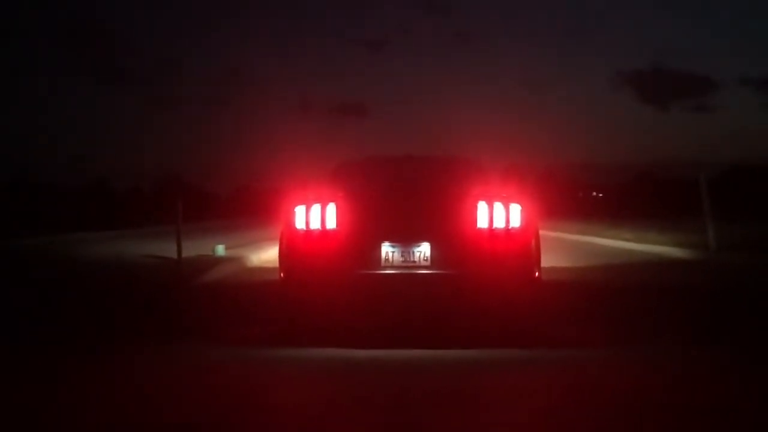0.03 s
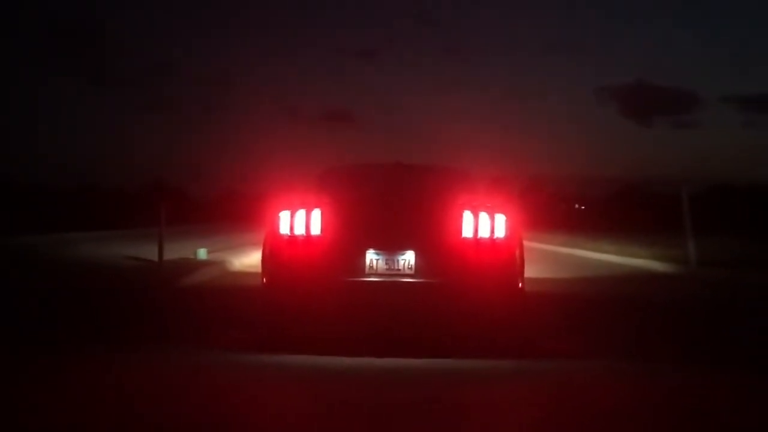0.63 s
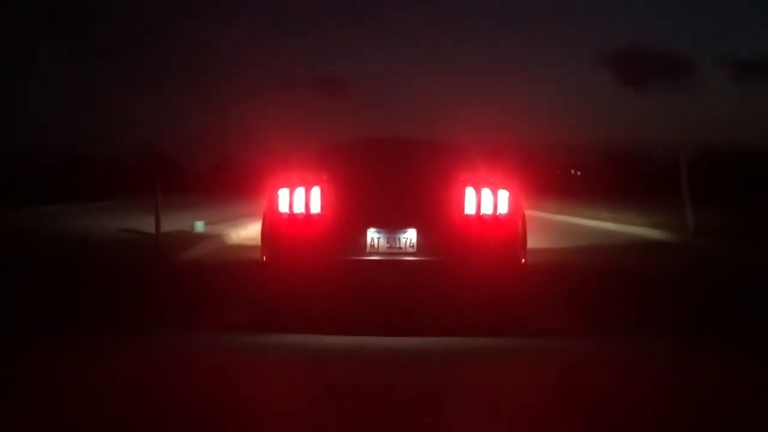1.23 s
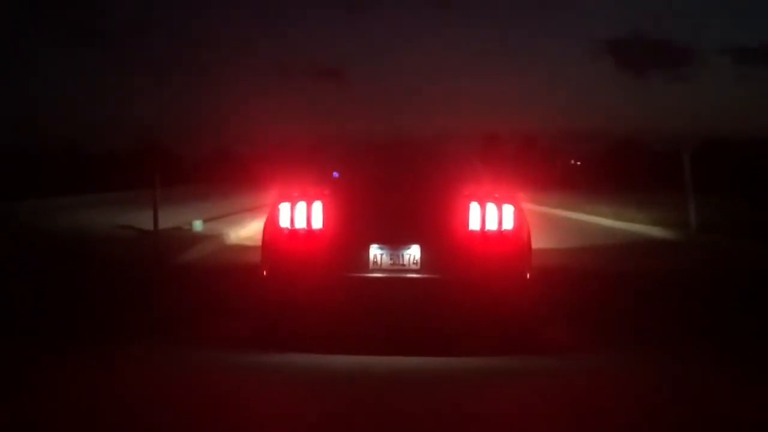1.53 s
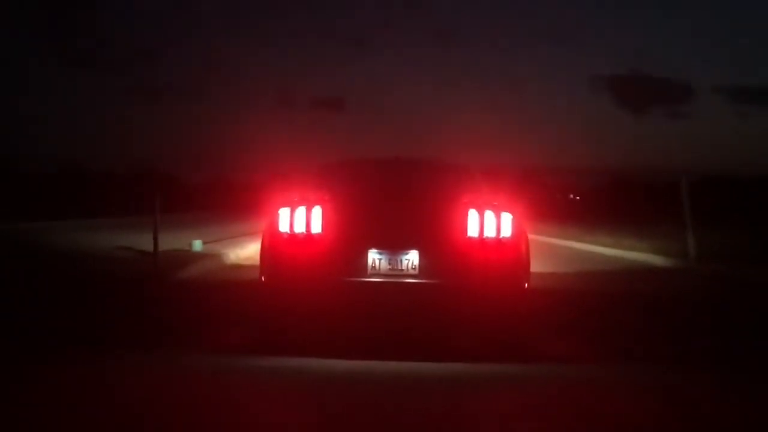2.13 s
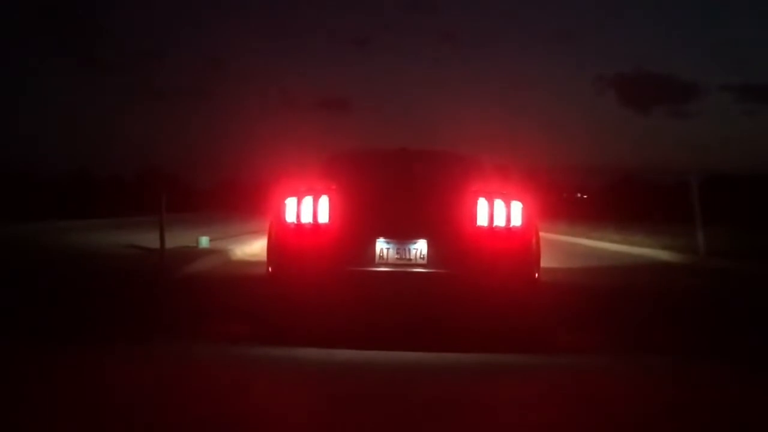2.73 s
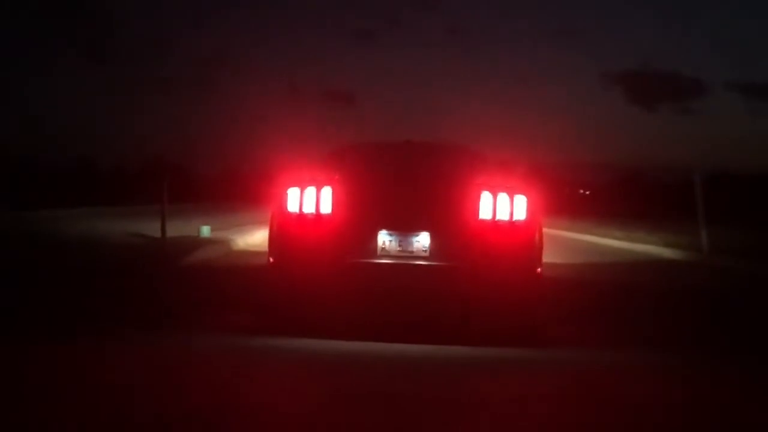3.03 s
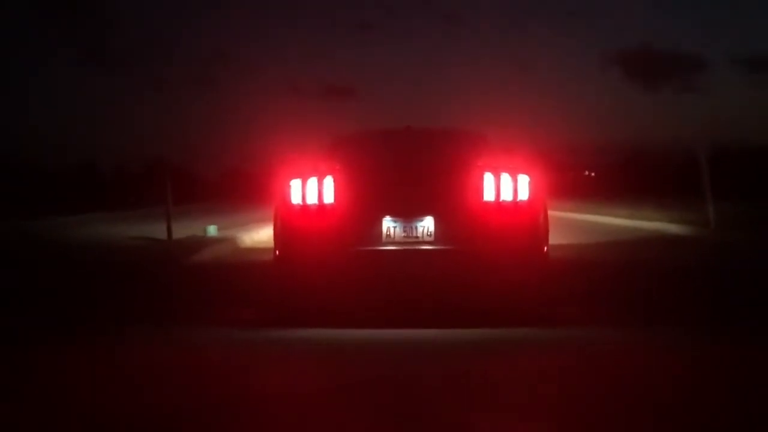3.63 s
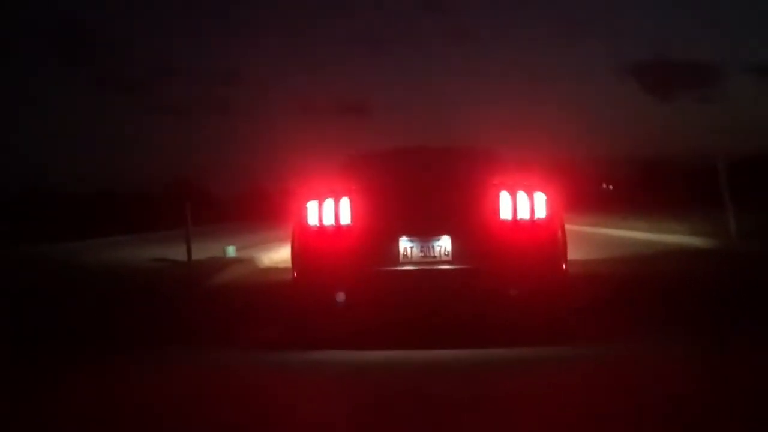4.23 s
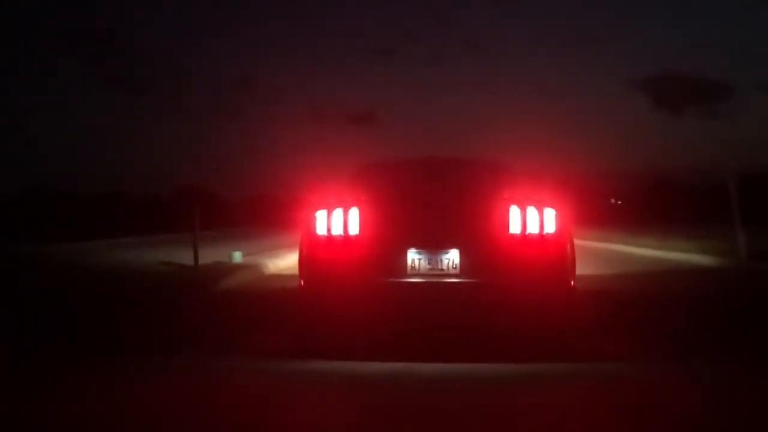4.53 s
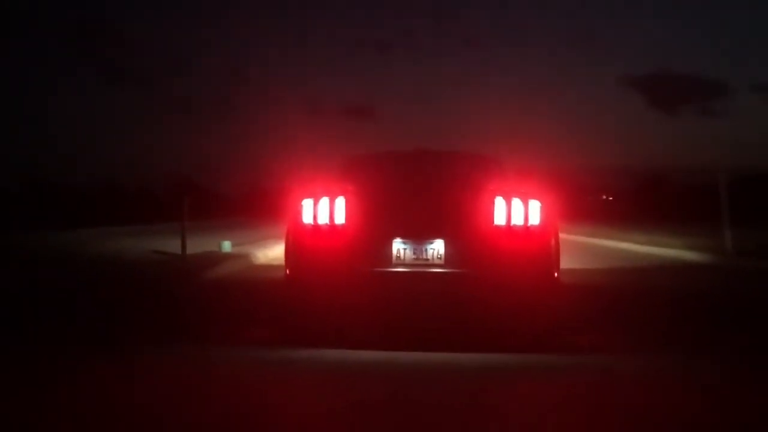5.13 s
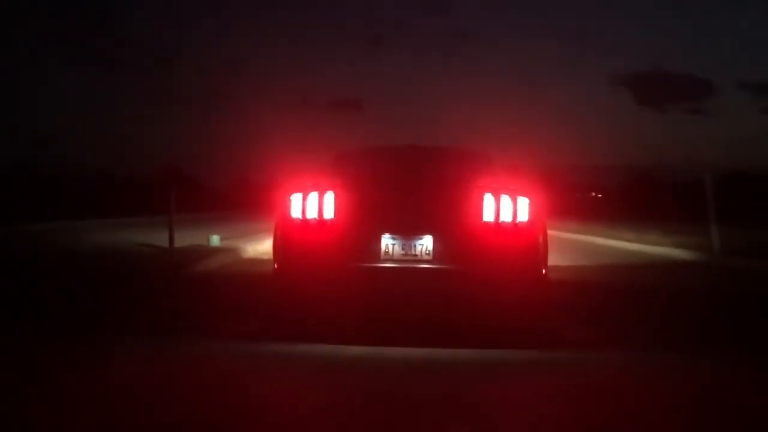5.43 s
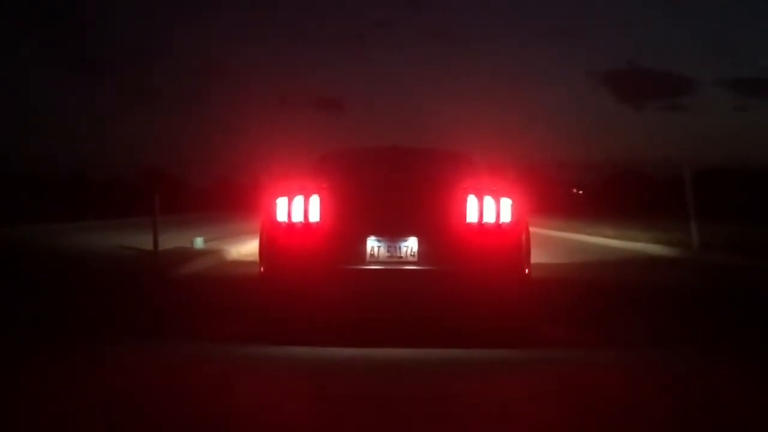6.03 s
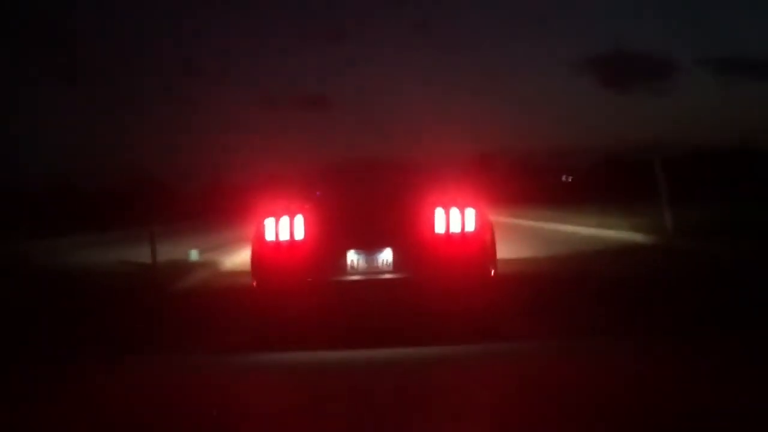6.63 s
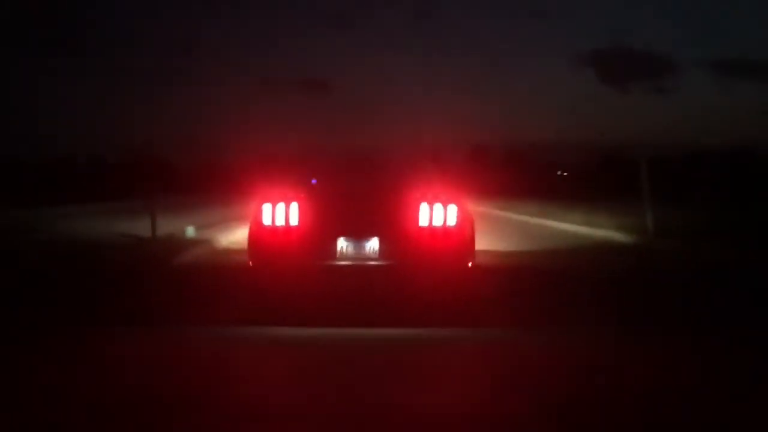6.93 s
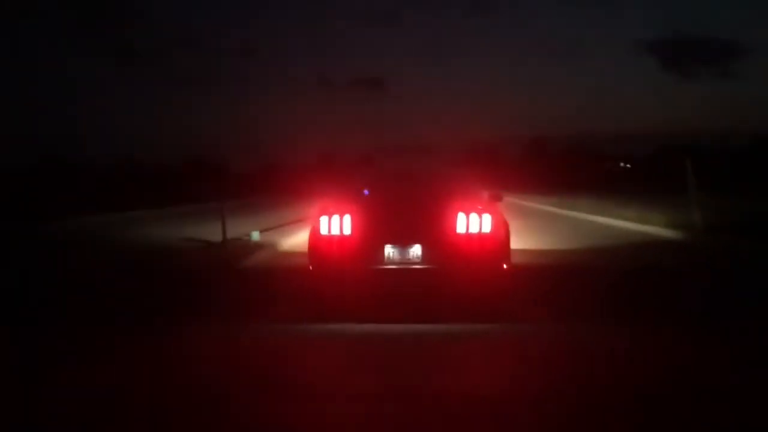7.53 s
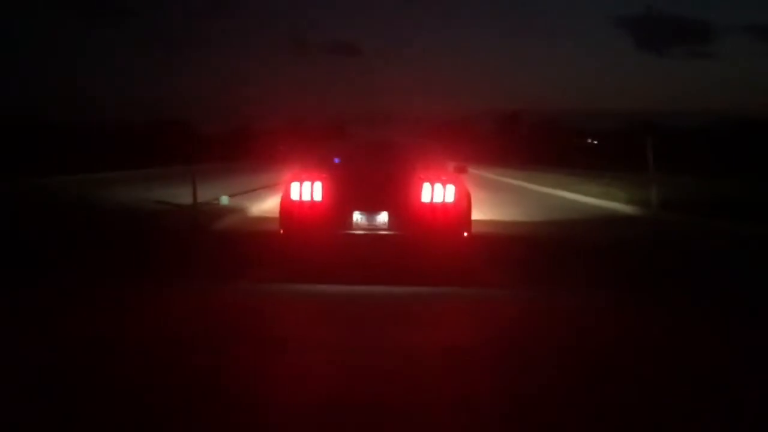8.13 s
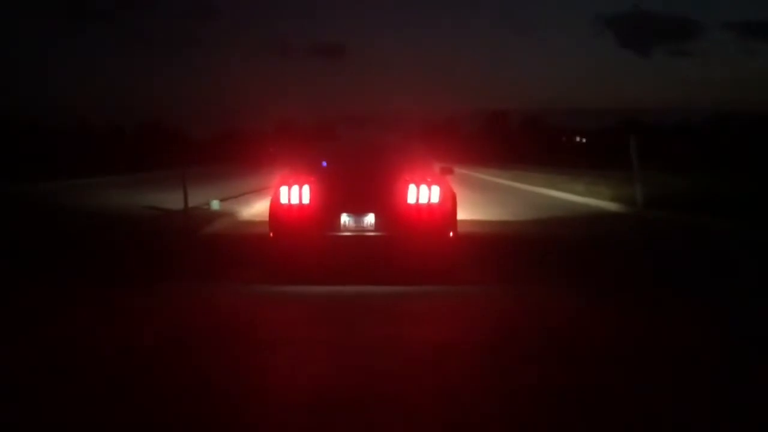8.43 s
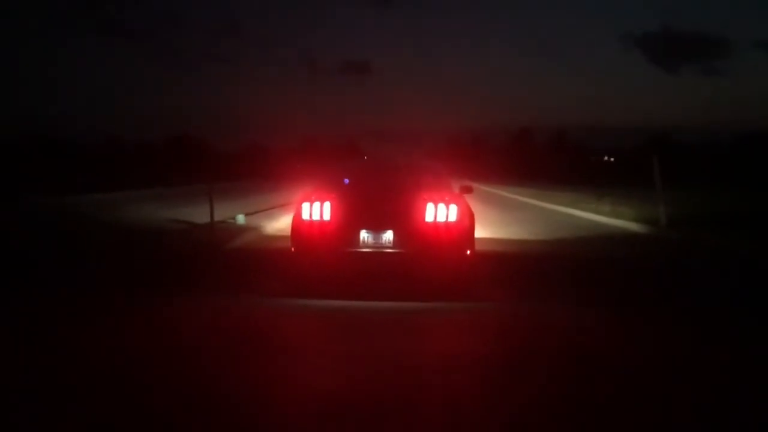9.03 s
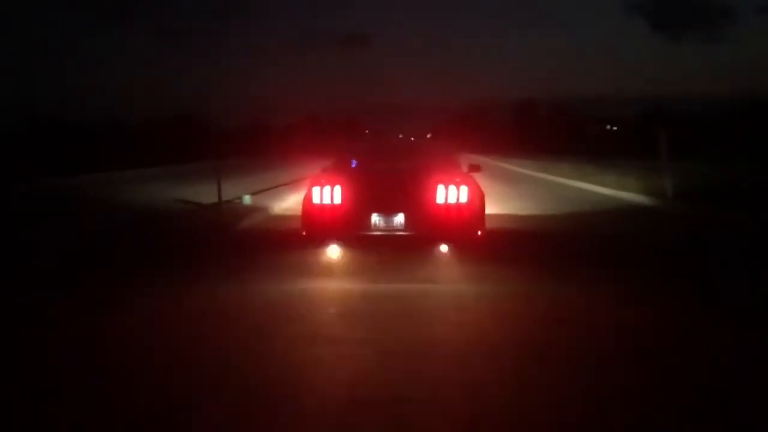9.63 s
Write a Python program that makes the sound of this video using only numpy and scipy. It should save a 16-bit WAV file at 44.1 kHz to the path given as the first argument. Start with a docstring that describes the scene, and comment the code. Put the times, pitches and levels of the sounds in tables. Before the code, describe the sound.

A tuned V8 car is heard from just behind on an open road, starting with a lumpy burble that sinks in pitch. At about 1.1 seconds it revs in a raspy roar, with a pop at 1.4. Shorter blips follow at 2, 2.5 and 3 seconds, then a quick crackle of pops at 3.5. Higher revs around 3.8 to 4.4 seconds bring a cluster of loud backfire bangs. Paired blips with more bangs come at about 5.1 to 5.6, 6.5 to 6.9 and 7.7 to 8.2 seconds. Between them the engine winds down, burbling, hissing and ticking, with scattered pops, including ones near 6, 8.4 and 9 seconds. A last rev at 9.5 seconds ends with a bang at 9.7. The loudest blasts slightly overload the microphone and leave a faint, dull echo.

```python
"""Tuned V8 with backfires

A V8 is blipped again and again on an open road at night, heard from just behind. On the throttle its
exhaust pulses excite the pipe resonances into a roar, and their turbulence rasps; off it the engine
lopes down, hissing and ticking. Unburnt fuel goes off as pops and bangs that overload the microphone."""
import sys
import numpy as np
from scipy import signal
from scipy.io import wavfile
from scipy.ndimage import uniform_filter1d

SR = 44100
rng = np.random.default_rng(int(sys.argv[2]) if len(sys.argv) > 2 else 0)


def unload_wav(signal):
    """Save mono or channel-first audio to the path in sys.argv[1] as 16-bit WAV at rate SR, clipped to [-1, 1]."""
    wavfile.write(
        sys.argv[1],
        SR,
        np.round(np.clip(np.atleast_2d(signal).T, -1, 1) * 32767).astype(np.int16),
    )


N = 432180
TIME = np.arange(N) / SR

# Engine speeds count four-stroke cycles a second; levels are relative within each layer.
# throttle blips: (start [s], length [s], roar rise [s], rasp rise [s], release [s],
# speed once open [Hz], speed at lift-off [Hz], roar [dB], rasp [dB], rumble [dB])
BLIPS = [ (1.098, 0.038, 0.016, 0.013, .015, 15.2, 15, -14.5, -42, -48),
         (1.16, 0.52, .17, .205, 0.14, 18, 19.3, -12.5, -22, -28.5),
         (2.062, 0.32, .1, .12, 0.048, 21.2, 23.6, -12.5, -21, -27),
         (2.486, .11, 0.14, 0.049, .045, 23.1, 27.3, -11, -29.5, -22.5),
         (3.035, 0.29, 0.093, 0.095, 0.065, 23.8, 25.6, -13, -19, -30),
         (3.837, 0.22, 0.088, .072, .025, 23.6, 29.8, -11.5, -19, -24.5),
         (4.183, .125, .06, .005, .018, 33, 35.5, -13, -16, -21),
         (5.103, 0.12, 0.077, .044, 0.032, 28.2, 31.3, -10.5, -18.5, -22.5),
         (5.376, .253, 0.05, 0.0073, 0.088, 30.8, 38, -13, -17, -21),
         (6.467, .13, 0.065, .052, 0.04, 28.5, 30.4, -11, -19, -32),
         (6.694, .145, .06, 0.0053, .03, 30.3, 35.8, -14.5, -17.5, -25),
         (7.719, .142, 0.052, .038, 0.039, 25.9, 30.8, -10.5, -19.5, -39),
         (7.984, 0.21, 0.053, .01, 0.036, 32.6, 39, -11.5, -20, -24.5),
         (9.472, 0.21, 0.077, .095, .028, 24.4, 31.5, -11, -17, -21)]
# spells with the throttle shut: (start [s], end [s], first speed [Hz], last speed [Hz], first burble [dB],
# last burble [dB], first hiss [dB], last hiss [dB], silencer drone [factor], lope [dB])
COASTS = [ (-.05, 1.155, 26.2, 13.9, -22, -17, -39.5, -32, 5.5, 22.5),
          (1.659, 2.056, 18.4, 16.8, -20.5, -23.5, -51, -40.5, 1.4, 4),
          (2.6, 3.042, 21.2, 20, -21, -21, -46, -44, 0.6, -2),
          (3.457, 3.836, 23.4, 20.2, -35, -21, -49.5, -37, 3.5, 9),
          (4.345, 5.097, 35.6, 25.45, -26, -20.5, -22, -34.5, 2.6, 1.5),
          (5.62, 6.468, 37.1, 25.35, -20.5, -22.5, -24, -32, 2, 1.5),
          (6.9, 7.715, 34.7, 23.9, -21, -23.5, -25, -41, 2.7, 7),
          (8.23, 9.47, 38.8, 23, -23, -21, -22.5, -40.5, 3.5, 6)]
# cylinders in firing order: (strength [dB], lateness [firing gaps]) on the throttle, then both coasting
CYLINDERS = [(-1.5, 0.016, -1, .13), (-5, 0.079, -1, 0.066), (-0.5, 0.01, -8.5, .19), (3.5, 0.09, -7, -.5),
             (-4.5, 0.1, -3, -.17), (-6.5, 0.0047, -7.5, -.03), (-3.5, 0.023, -7.5, .1),
             (2, 0.0086, -5, .26)]
# standing waves of the hot exhaust: (frequency [Hz], width [Hz], gain [dB])
HOT_MODES = [(241, 42, 8.5), (314, 56, 5.5), (530, 83, 2.5), (756, 23, 3.5), (799, 29, -20.5)]
# spectral envelopes of turbulent rasp, flame blasts and sharp ticks: (frequency [Hz], gain [dB])
RASP_SPECTRUM = [(100, -14), (400, 11.5), (900, 5.5), (1600, -3), (2300, 0.5), (3500, -3), (4800, -6),
                 (6200, -5), (7400, -9.5), (8700, -11.5)]
BLAST_SPECTRUM = [(25, -15.5), (80, -12), (160, -2), (250, 2), (450, 2), (750, -3), (1200, -17),
                  (2000, -17.5), (5000, -57.5)]
TICK_SPECTRUM = [(300, -6), (1200, -9.5), (2500, 6), (4000, 5), (6200, 4.5), (7500, -1.5), (8700, -6)]


def amp(db):
    """Amplitude ratio of a level in decibels."""
    return 10 ** (np.asarray(db) / 20)


def ramp(start, length):
    """Linear rise from 0 to 1 over length seconds."""
    return np.clip((TIME - start) / max(length, 1e-3), 0, 1)


def add(mix, start, sound):
    """Superposition: a sound joins the mix at start seconds."""
    part = mix[round(start * SR):][:len(sound)]
    part += sound[:len(part)]


def steadied(x, span):
    """Normalisation: the running rms over span seconds is held at 1."""
    size = max(int(span * SR), 8)
    power = uniform_filter1d(uniform_filter1d(x * x, size), size)
    return x / np.sqrt(abs(power) + 1e-14)


def dying(x, decay):
    """Exponential decay: each click gains a tail with a time constant of decay seconds."""
    return signal.lfilter([1], [1, -np.exp(-1 / (decay * SR))], x)


def softened(x, force, edge_hz):
    """Low-pass blend: a weak jet of gas (force near 0) has rounder pulses and less treble."""
    force = np.clip(force, 0, 1)
    rounded = signal.sosfiltfilt(signal.butter(3, edge_hz, fs=SR, output="sos"), x)
    return force * x + (1 - force) * rounded


def piped(x, spectrum, modes=()):
    """Pipe resonance: a minimum-phase filter of unit energy imposes an envelope and standing waves."""
    # tailpipe resonances and notches: (frequency [Hz], width [Hz], gain [dB])
    tailpipe_modes = [(411.6, 12.2, -25.5), (1060.6, 21, 9), (1197, 8.5, -28.5), (1384, 132, 5.5),
                      (1520, 39, -9), (1873, 56, -6), (2090, 230, 2.5), (2437, 53, -17), (2534, 160, 3),
                      (4940, 320, -6)]
    hz = np.fft.rfftfreq(8192, 1 / SR)
    knot_hz, knot_db = np.transpose(spectrum)
    db = np.interp(np.log(hz + 1), np.log(knot_hz), knot_db)
    for centre, width, gain_db in [*tailpipe_modes, *modes]:
        db += gain_db / (1 + (2 * (hz - centre) / width) ** 2)
    log_gain = np.log(amp(np.r_[db, db[-2:0:-1]]))
    response = np.exp(np.conj(signal.hilbert(log_gain)))
    ring = np.fft.ifft(response).real[:len(hz)]
    return signal.oaconvolve(x, ring / np.linalg.norm(ring))[:len(x)]


def speed():
    """Cycle rate in Hz: it glides exponentially, up on each blip and down when coasting."""
    marks = []
    for start, length, rise, _, release, low, high, *_ in BLIPS:
        marks += [(start + rise, low), (start + length - release, high)]
    for start, end, first, last, *_ in COASTS:
        marks += [(start, first), (end, last)]
    times, hz = np.transpose(sorted(marks))
    return np.exp(np.interp(TIME, times, np.log(hz)))


def firings(strength_db, lateness):
    """Phase is the integral of speed: it sets the time, strength and cylinder of each exhaust stroke."""
    count = len(CYLINDERS)
    strokes = np.cumsum(speed()) * count / SR
    number = np.arange(int(strokes[-1]) - 1)
    cylinder = number % count
    return np.interp(number + lateness[cylinder], strokes, TIME), strength_db[cylinder], cylinder


def pulses(times, db, scatter_db, jitter):
    """Impulse train: one click a stroke, scattered in strength and by jitter seconds in time."""
    size, slip = rng.standard_normal((4096, 2))[:len(times)].T
    at = np.clip(np.round((times + jitter * slip) * SR).astype(int), 0, N - 1)
    return np.bincount(at, amp(db + scatter_db * np.clip(size, -2, 2)), N)


def throttle(opening, closing):
    """Gate: 1 during each blip, falling to 0 once the throttle has snapped shut."""
    gates = (ramp(start, opening) - ramp(start + length, closing) for start, length, *_ in BLIPS)
    return np.clip(sum(gates), 0, 1)


def coast_levels():
    """Envelopes of burble, hiss and rumble in dB: they drift through each spell, and flares shift them."""
    # fuel flaring in the pipes: (middle [s], half length [s], rumble [dB], change of hiss [dB])
    flares = [(1.31, 0.061, -18, 9.5), (1.413, 0.032, -11.5, -11), (1.66, 0.055, -33, 1.5),
              (2.255, 0.033, -17, -1), (3.169, 0.035, -17.5, 3), (3.502, 0.043, -38, 16.5),
              (4.39, 0.039, -23.5, -4.5), (4.566, 0.029, -23.5, 3), (5.752, 0.077, -24.5, 7),
              (5.957, 0.075, -29, 3.5), (6.83, .035, -19.5, 8), (7.083, 0.064, -50, 3),
              (7.819, 0.019, -20, 6), (8.38, 0.062, -29, 4)]
    build_s, hiss_fade_s, burble_fade_s = 0.059, 0.087, 0.15
    burble, hiss, low = (np.full(N, db) for db in (-29.0, -46.5, -47.0))  # while the spark is cut
    for start, end, _, _, burble_from, burble_to, hiss_from, hiss_to, _, _ in COASTS:
        along, built = ramp(start, end - start), ramp(start - build_s, build_s)
        burble_gate = built - ramp(end, burble_fade_s)
        hiss_gate = built - ramp(end - hiss_fade_s, hiss_fade_s)
        burble += burble_gate * (burble_from + (burble_to - burble_from) * along - burble)
        hiss += hiss_gate * (hiss_from + (hiss_to - hiss_from) * along - hiss)
    for middle, half, rumble_db, change_db in flares:
        away = ((TIME - middle) / half) ** 2
        low = np.maximum(low, rumble_db - 9.5 * away)
        hiss += change_db / (1 + away ** 2)
    return burble, hiss, low


def blip_levels():
    """Envelopes of roar, rasp and rumble in dB: each blip leaves the coasting levels and returns."""
    rasp_lag_s = 0.013  # the rasp outlasts the roar
    roar, rasp, low = coast_levels()
    for start, length, roar_rise, rasp_rise, release, _, _, roar_db, rasp_db, rumble_db in BLIPS:
        lift_off = start + length - release
        held = (1 - ramp(lift_off, release)) * ramp(start, roar_rise) ** 0.63  # comes early
        bite = (1 - ramp(lift_off + rasp_lag_s, release)) * ramp(start, rasp_rise) ** 2  # comes late
        roar += held * (roar_db - roar)
        rasp += bite * (rasp_db - rasp)
        low += bite * np.maximum(rumble_db - low, 0)
    return roar, rasp, low


def roadside(x, t60, delay):
    """Scattering: the verges return thin, dull echoes that die away exponentially."""
    t = np.arange(SR // 2) / SR
    taps = rng.standard_normal(len(t)) * (rng.random(len(t)) < 2000 / SR)
    taps *= (t > delay) * amp(-60 * t / t60)
    dull = signal.lfilter(*signal.butter(1, 2500, fs=SR), x)
    return signal.oaconvolve(dull, taps / np.linalg.norm(taps))[:N]


def rumble(level_db):
    """Combustion noise: fuel burning in the pipes flutters at low frequencies."""
    # spectral envelope of the flame: (frequency [Hz], gain [dB])
    flame_spectrum = [(15, -19), (35, -20), (60, -1), (90, -12.5), (140, -5), (300, -34), (1000, -78.5)]
    return amp(level_db) * steadied(piped(rng.standard_normal(N), flame_spectrum), span=0.031)


def drone_and_lope():
    """Speed-dependent gains: the silencers drone as speed sinks; near one speed a cylinder thumps."""
    drone_hz, lope_hz, lope_width_hz = 17.9, 27.3, 2.4
    hz, spells = speed(), np.array(COASTS)
    spell = np.maximum(np.searchsorted(spells[:, 0], TIME) - 1, 0)
    drone, lope_db = spells[spell, -2:].T
    nearness = np.exp(-((hz - lope_hz) / lope_width_hz) ** 2)
    return drone * (drone_hz / hz) ** 2, lope_db * nearness - 2


def ticking_hiss(times, strength_db, hiss_db):
    """Flow noise and wave steepening: the gas hisses in puffs, and some pulses sharpen into ticks."""
    # spectral envelope of the gas flow: (frequency [Hz], gain [dB])
    hiss_spectrum = [(200, 0), (700, 7), (1300, -6), (1800, -5.5), (2700, 0), (3400, 3), (4400, 0),
                     (5500, -11), (6500, -7), (7600, -9.5), (8700, -16.5)]
    shocks = pulses(times, strength_db, scatter_db=5.5, jitter=0.0001)
    puffs = (dying(shocks, decay=0.0021) + 0.62) * rng.standard_normal(N)
    hiss = steadied(piped(puffs, hiss_spectrum), span=0.13)
    steep = rng.random(len(times)) < 0.3
    fronts = pulses(times[steep], strength_db[steep], scatter_db=4.5, jitter=0.0001)
    ticks = steadied(piped(-fronts, TICK_SPECTRUM), span=0.2)
    tick_share = np.interp(hiss_db, [-38, -22], [0.02, 0.3])  # ticks stand out in a strong flow
    flow = np.sqrt(1 - tick_share) * hiss + np.sqrt(tick_share) * ticks
    return amp(hiss_db + 2) * softened(flow, np.maximum((hiss_db + 49) / 8, 0.5), edge_hz=4400)


def coasting():
    """Forced resonance off the throttle: uneven pulses burble in the cooler pipes, with hiss and rumble."""
    # spectral envelope of the burble: (frequency [Hz], gain [dB])
    burble_spectrum = [(25, -45), (60, -9), (110, -6), (160, -9.5), (280, -0.5), (500, -3.5), (750, -9),
                       (1100, -10.5), (1700, -22.5), (3000, -37), (9000, -56.5)]
    # standing waves of the cooler exhaust: (frequency [Hz], width [Hz], gain [dB])
    cool_modes = [(152, 20.7, 13.5), (175, 22, -2.5), (227.4, 47, 2.5), (280.4, 35, 5), (329.5, 43, 10.5),
                  (457, 140, 8), (607, 46, 15.5), (654, 46.6, -26), (736, 72, 6.5)]
    burble_db, hiss_db, rumble_db = coast_levels()
    drone, thump_db = drone_and_lope()
    times, strength_db, cylinder = firings(*np.transpose(CYLINDERS)[2:])
    lope_db = np.interp(times, TIME, thump_db) * (cylinder == 0)
    beat = pulses(times, strength_db + lope_db, scatter_db=1, jitter=0.00006)
    beat += 0.002 * rng.standard_normal(N)
    burble = softened(-piped(beat, burble_spectrum, cool_modes), (hiss_db + 50.5) / 14, edge_hz=780)
    bass = signal.sosfiltfilt(signal.butter(2, [66, 225], "band", fs=SR, output="sos"), burble)
    burble = steadied(burble + drone * bass, span=0.14)
    hiss = ticking_hiss(times, 0.5 * strength_db, hiss_db)
    return amp(burble_db - 1.33) * burble + hiss + rumble(rumble_db - 0.5)


def boom(t, hz, decay):
    """Damped oscillation: the gas column in the pipe swings once or twice after a blast."""
    return 2 * np.sin(2 * np.pi * hz * t) * np.exp(-t / decay)


def pops():
    """Impulse excitation: a small pocket of fuel goes off with a crack, a thud and a low swing."""
    # pops: (time [s], level [dB], relative crack [dB], relative boom [dB])
    ignitions = [(1.419, -2, 6, -38), (2.544, -8, -48, -41), (3.433, -2, -2.5, -11), (3.477, -1, -0.5, -28),
                 (3.511, 2, -31, -46), (3.538, -2.5, -3, -30), (4.318, -0.5, 0, -21), (4.348, -8, 8.5, -18),
                 (4.464, -18, -8, -29), (4.477, -14, 3, -34), (4.551, -4, 1, -12.5), (4.988, -10, 6, -25),
                 (5.142, -3, 1, -30), (5.665, -4, -16, -8), (5.825, -4, -16, -11), (5.946, -4.5, 0, -8),
                 (6.323, -8, -14, -32), (6.359, -15, 5, -22), (6.853, -2, 0, -19), (7.526, -21, 2, -23),
                 (8.351, -11.5, -1, -21), (8.381, -1, -5, -12), (9.018, -5.5, -21, -35),
                 (9.054, -16.5, 7.5, -15)]
    t, out = np.arange(SR // 5) / SR, np.zeros(N)
    front = t == 0
    for start, db, crack_db, boom_db in ignitions:
        flame, spit = rng.standard_normal((2, len(t)))
        body = piped(0.8 * flame * np.exp(-t / 0.018) - 14 * front, BLAST_SPECTRUM)
        crack = amp(crack_db - 3) * piped(spit * np.exp(-t / 0.006) - 14 * front, TICK_SPECTRUM)
        swing = amp(boom_db + 12) * boom(t, hz=72, decay=0.013)
        add(out, start, amp(db - 15.5) * (body + crack + swing))
    return out


def bangs():
    """Shock excitation: a backfire drives a steep front and a ragged blast of flame through the pipes."""
    # backfires: (time [s], level [dB], relative crack [dB], relative boom [dB], length [s])
    backfires = [(4.094, -1, -0.5, -25, 0.014), (4.134, -9.5, 5.5, -13, 0.018), (4.158, -7, 4, -18, 0.014),
                 (4.183, -8, -8, -16, 0.032), (4.374, -1.5, -10.5, -29, 0.019),
                 (5.244, -1.5, -3.5, -33, 0.016), (5.335, -3, -3.5, -29, 0.017),
                 (6.611, 0.5, -7.5, -29, 0.014), (6.698, -0.5, -5, -28, 0.016),
                 (7.893, 1.5, -9.5, -23, 0.011), (7.988, -13, 12.5, -30, 0.019),
                 (9.711, -0.5, -6.5, -50, 0.015)]
    t, out = np.arange(SR // 5) / SR, np.zeros(N)
    front = t == 0
    for start, db, crack_db, boom_db, length in backfires:
        flame, spit = rng.standard_normal((2, len(t)))
        body = steadied(piped(flame - 18 * front, BLAST_SPECTRUM, HOT_MODES), span=0.0017)
        body *= np.exp(-np.maximum(t - length, 0) / 0.0049)
        spit *= np.exp(-np.maximum(t - 0.63 * length, 0) / 0.014)
        crack = amp(crack_db + 1.5) * piped(spit - 20 * front, RASP_SPECTRUM)
        swing = amp(boom_db + 15.5) * boom(t, hz=61.6, decay=0.0074)
        add(out, start, amp(db - 11) * (body + crack + swing))
    return out


def rasping(times, strength_db, rasp_db):
    """Jet noise: each exhaust pulse tears a puff of turbulence from the tailpipe."""
    shocks = pulses(times, strength_db, scatter_db=-0.5, jitter=0.0001)
    puffs = (dying(shocks, decay=0.0016) + 0.25) * rng.standard_normal(N)
    rasp = steadied(piped(puffs - 3 * shocks, RASP_SPECTRUM), span=0.078)
    return amp(rasp_db + 4) * softened(rasp, (rasp_db + 26) / 8, edge_hz=7500)


def roaring():
    """Forced resonance on the throttle: hard pulses roar in the hot pipes, with rasp and rumble."""
    # spectral envelope of the roar: (frequency [Hz], gain [dB])
    roar_spectrum = [(25, -38), (70, -26), (140, 3), (220, 3.5), (340, 9), (520, 7), (750, 1.5),
                     (1100, -12), (1700, -34.5), (3000, -25), (9000, -55)]
    roar_db, rasp_db, rumble_db = blip_levels()
    hz = speed()
    times, strength_db, _ = firings(*np.transpose(CYLINDERS)[:2])
    ragged = np.interp(np.interp(times, TIME, hz), [29, 34], [1, 2.2])  # uneven burning at high speed
    beat = pulses(times, strength_db, scatter_db=1.7 * ragged, jitter=0.00008 * ragged)
    roar = softened(-piped(beat, roar_spectrum, HOT_MODES), (rasp_db + 49) / 16, edge_hz=426)
    roar = steadied(roar, span=0.035)
    bright = np.clip((hz - 24) / 11, 0, 1)  # the faster the engine, the steeper the pulses
    blare = signal.lfilter(*signal.butter(2, 480, "high", fs=SR), roar)
    roar = steadied(roar * (1 - 0.23 * bright) + 1.73 * bright * blare, span=0.012)
    return amp(roar_db) * roar + rasping(times, strength_db, rasp_db) + rumble(rumble_db - 0.5)


def scene():
    """Superposition: roaring and coasting alternate, joined by bangs, pops and roadside echoes."""
    opened = throttle(opening=0.0042, closing=0.043)
    car = opened * roaring() + (1 - opened) * coasting() + bangs() + pops()
    echoes = roadside(car, t60=0.85, delay=0.03)
    return (car + amp(-18) * echoes)[None]


def record(dry):
    """Saturation: the overloaded microphone rounds off the peaks; a low-pass then limits the band."""
    ceiling, edge_hz = 0.92, 9300
    driven = dry * amp(2.5)
    limited = driven / (1 + (driven / ceiling) ** 6) ** (1 / 6)
    low_pass = signal.firwin(301, edge_hz, window=("kaiser", 8), fs=SR)
    return signal.oaconvolve(limited, low_pass[None], "same")


dry = scene()
out = record(dry)
unload_wav(out)
```